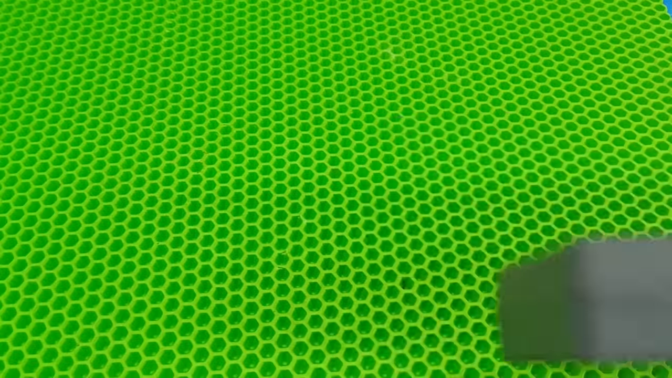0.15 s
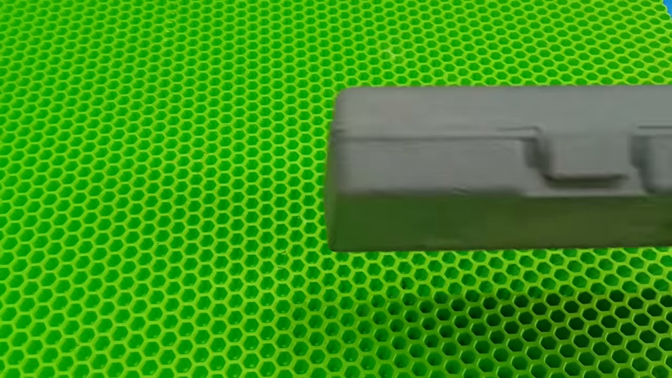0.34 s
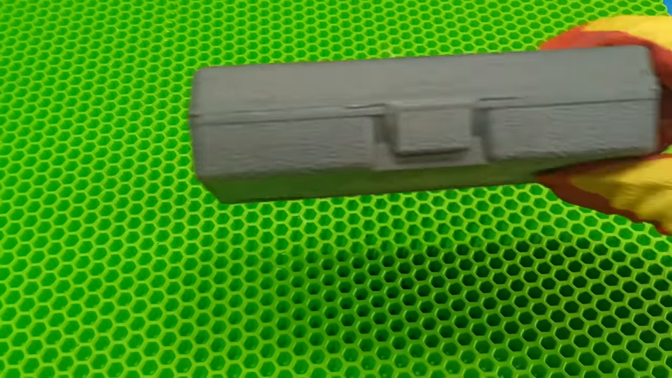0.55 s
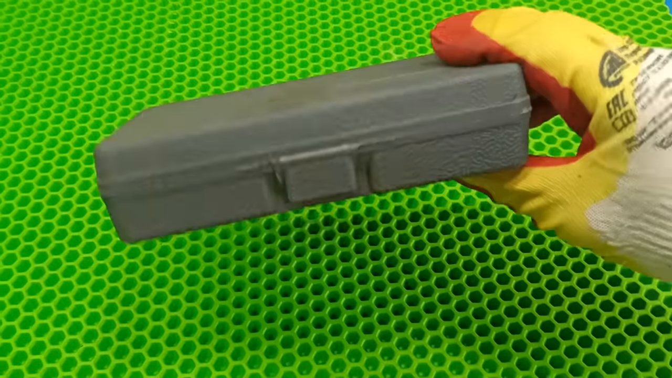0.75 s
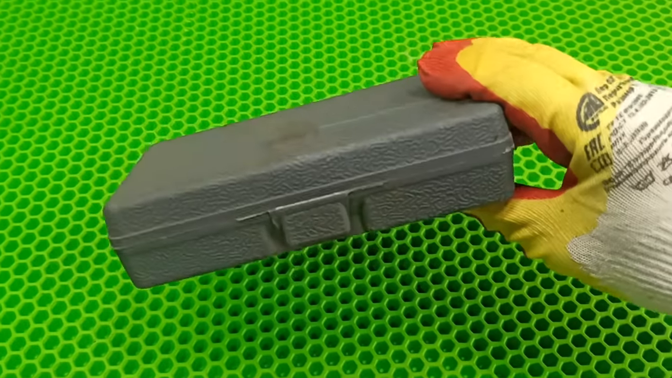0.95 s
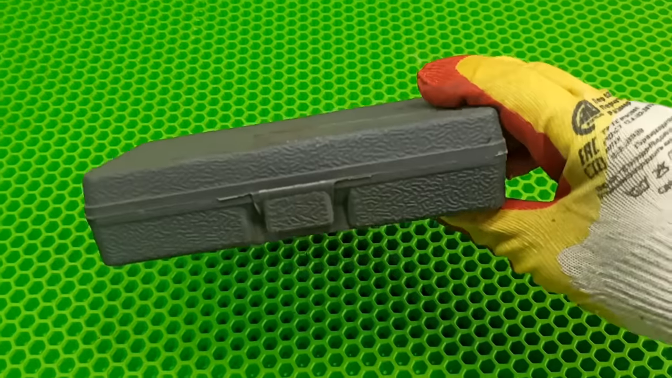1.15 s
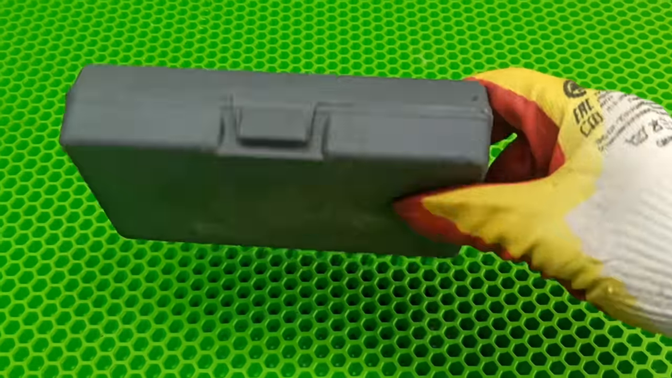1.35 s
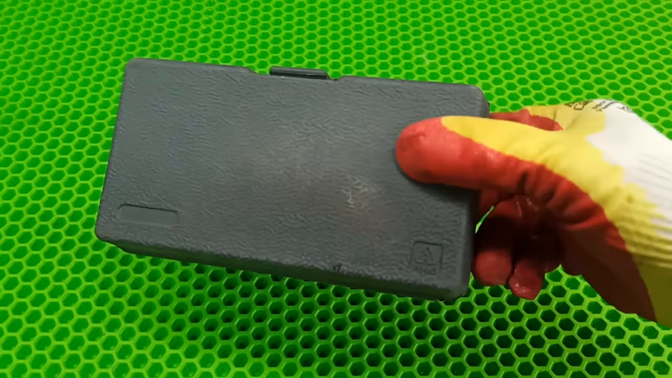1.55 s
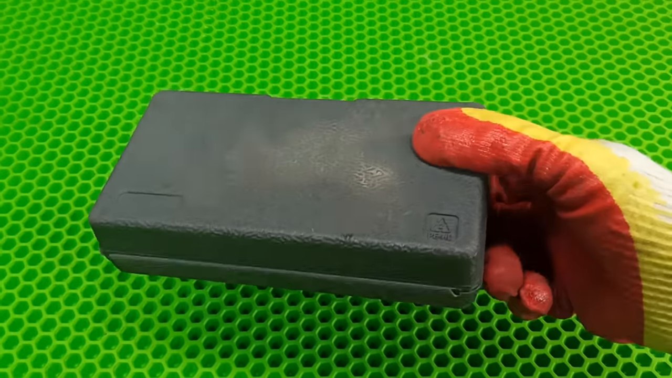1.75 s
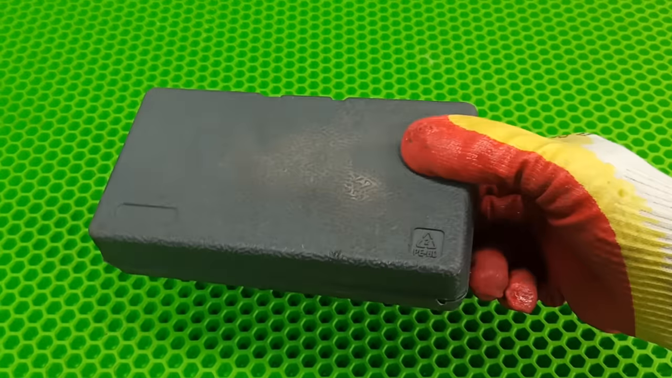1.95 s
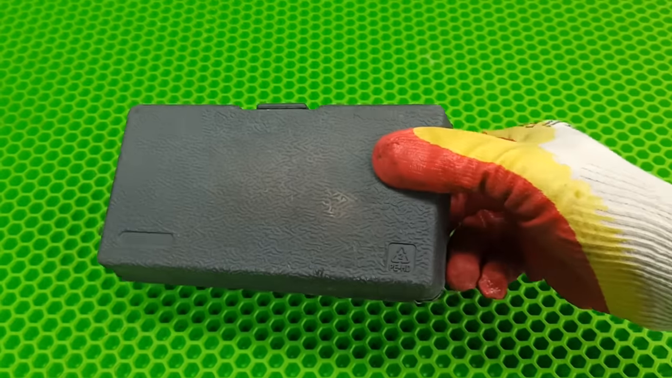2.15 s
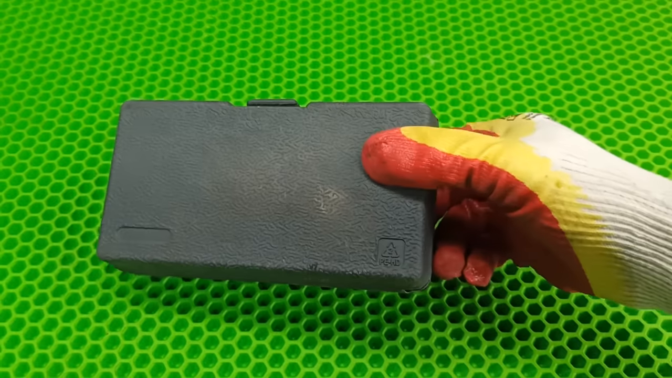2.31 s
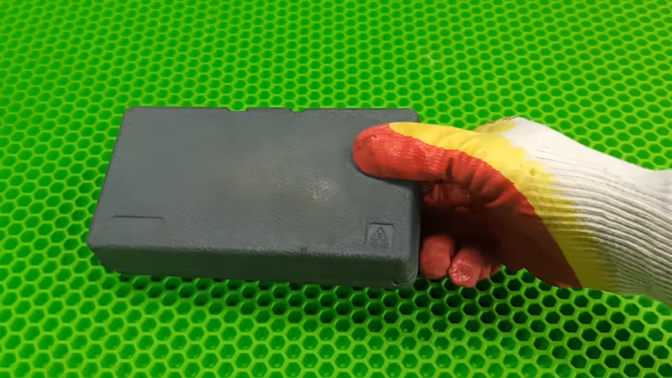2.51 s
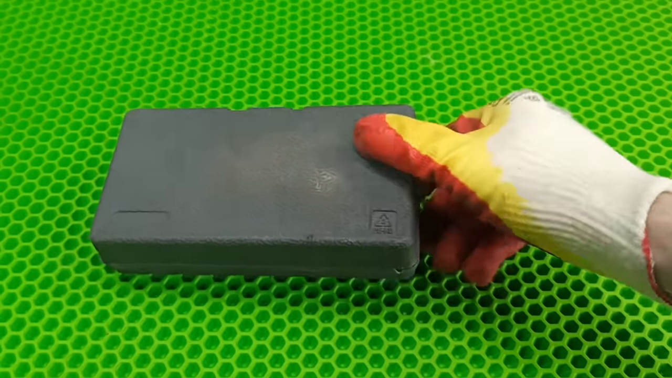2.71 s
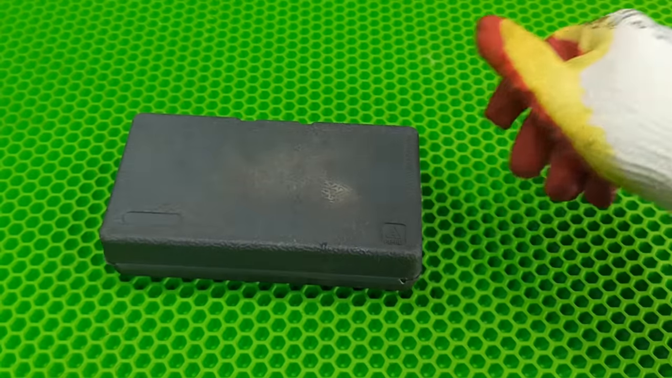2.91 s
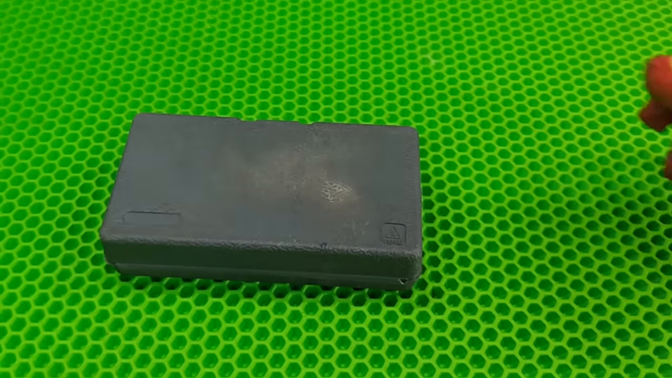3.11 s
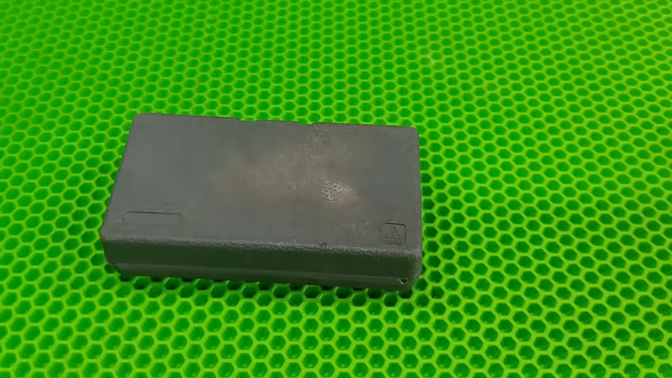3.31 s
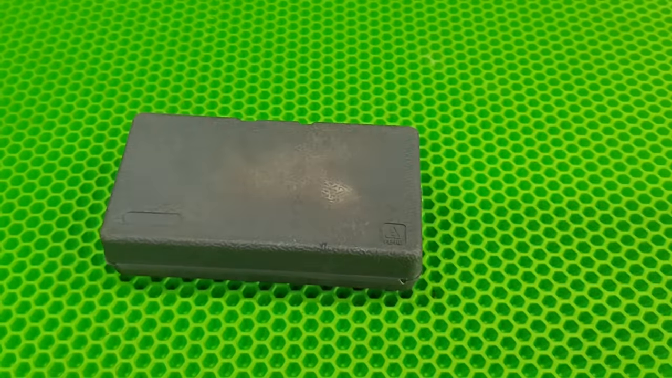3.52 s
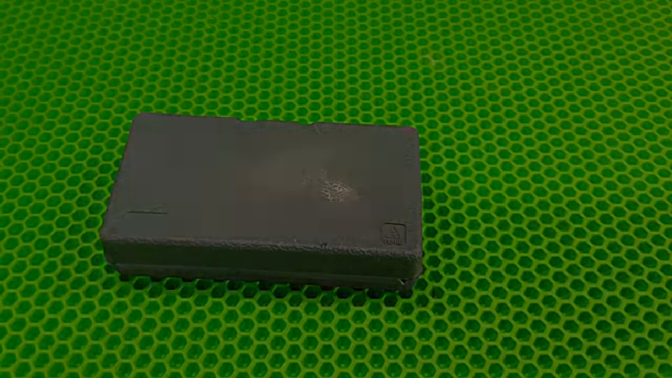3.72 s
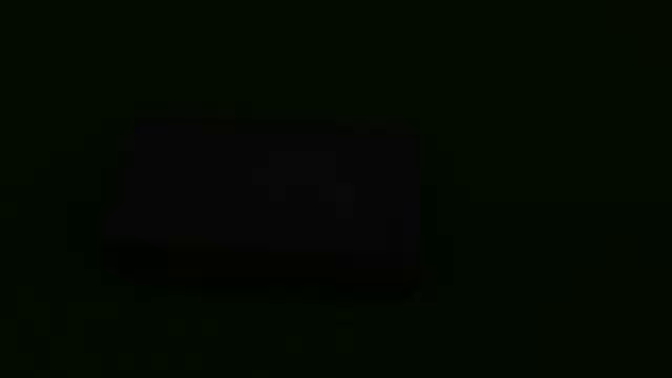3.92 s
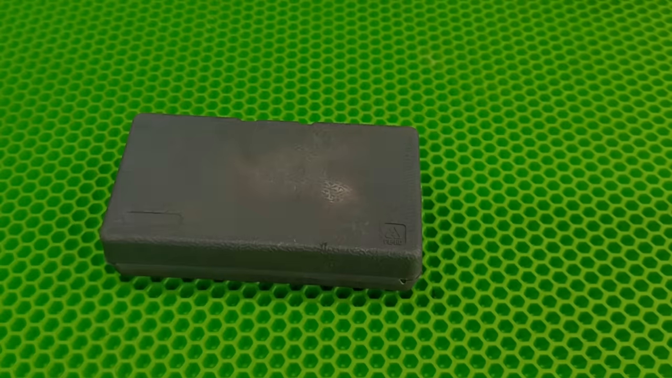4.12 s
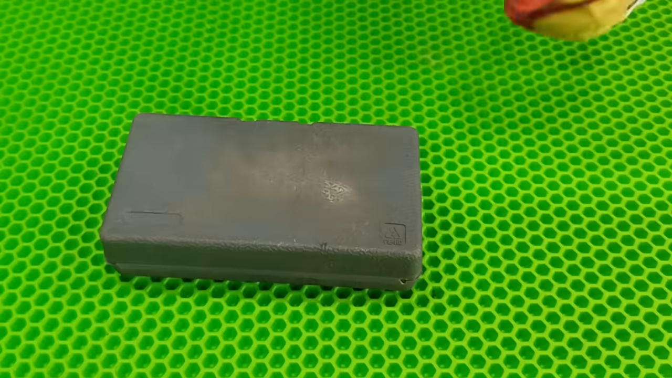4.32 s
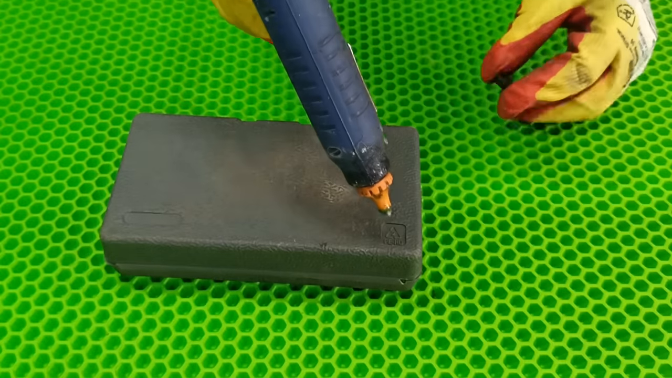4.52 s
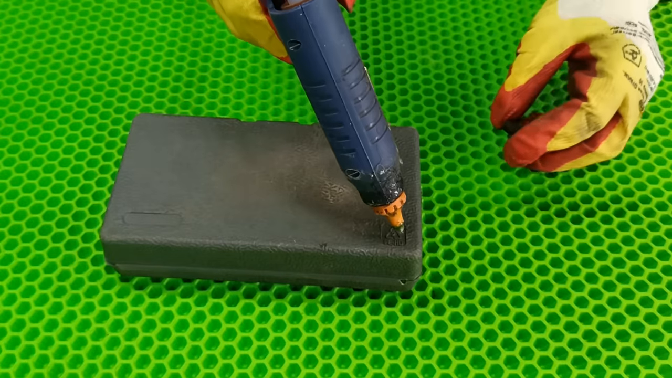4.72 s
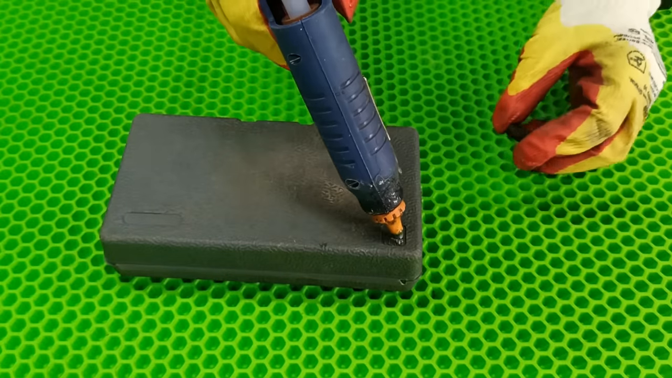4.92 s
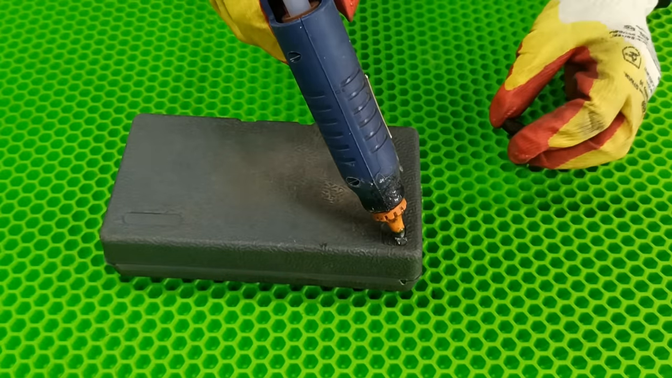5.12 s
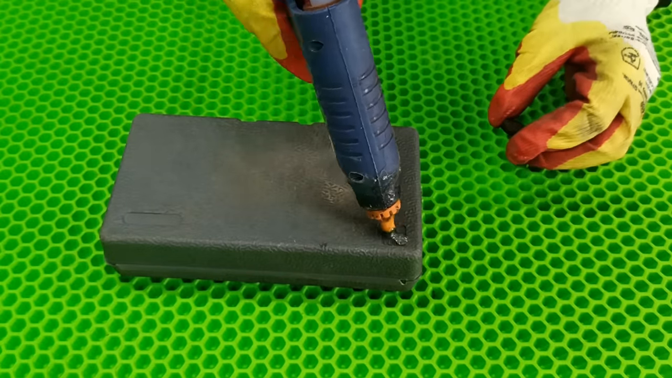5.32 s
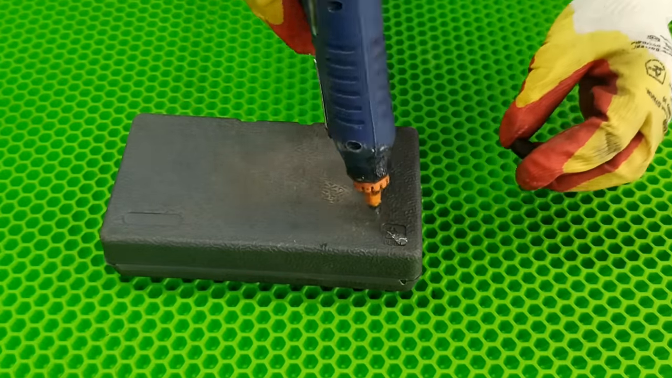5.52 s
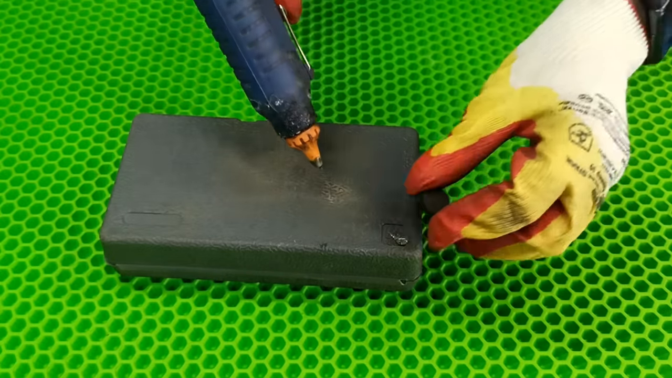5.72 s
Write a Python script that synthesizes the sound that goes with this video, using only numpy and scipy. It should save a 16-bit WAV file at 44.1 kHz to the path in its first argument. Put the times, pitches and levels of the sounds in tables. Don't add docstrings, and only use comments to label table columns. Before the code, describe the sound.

Close indoor workshop sounds: soft glove rubs, hollow knocks and loose tools shifting inside a plastic case, a sharp double knock, then a heavy flat drop rocking to rest. The background air changes smoothly; a bright sliding hiss grows, a hard plastic clunk bounces several times, and small dry taps finish over faint room noise.

```python
import sys
import numpy as np
from scipy import signal
from scipy.fft import rfft, irfft, next_fast_len
from scipy.io import wavfile
from scipy.ndimage import uniform_filter1d, map_coordinates

SR = 44100
rng = np.random.default_rng(int(sys.argv[2]) if len(sys.argv) > 2 else 0)


def linear_from_db(decibels):
    return 10 ** (np.asarray(decibels, float) / 20)


def bounce(signal):
    frames = np.transpose(np.atleast_2d(signal))
    limited = np.clip(frames, -1, 1)
    pcm = np.round(limited * 32767).astype(np.int16)
    wavfile.write(sys.argv[1], SR, pcm)


N = 253575
TIME = np.arange(N) / SR
EVENT_TIME = np.arange(SR // 4) / SR

# (frequency [Hz], width [Hz], level [dB])
TOOL_MODES = [(482, 60, 2), (684, 80, 3.5), (843, 113, 2.5), (973, 110, 3.5), (1210, 310, -2.5),
              (1630, 370, -6.5), (2034, 200, -12), (2360, 130, -13), (3380, 2200, -19.5)]
# (frequency [Hz], width [Hz], level [dB])
BARREL_MODES = [(237, 39, -14.5), (490, 90, -14), (658, 97, -5), (777, 120, -7.5), (1145, 97, 0),
                (1380, 226, -7.5), (1700, 290, -7), (2346, 137, -4), (2800, 540, -12), (3650, 670, -13.5),
                (4220, 1530, -21.5)]
# (frequency [Hz], level [dB per Hz])
CRACK_SPECTRUM = [(900, -40), (1800, 4.5), (3200, -18.5), (4400, -3), (6800, -1.5), (8500, -12),
                  (12000, -37.5), (16000, -38.5)]
# (frequency [Hz], level [dB per Hz])
SLIDE_SPECTRUM = [(1200, -19), (2000, -9), (3400, -10), (5500, -8), (7500, -4), (9400, -4), (12000, -12),
                  (13000, -42)]
# (frequency [Hz], level [dB per Hz])
SHEEN_SPECTRUM = [(10500, -59), (12300, 2.5), (13500, -7), (15000, -6), (16000, -0.5)]
# (time [s], peak [dB], snap [dB], t60 [s])
GUN_LANDING = [
    (4.634, -20.5, -27, 0.023),
    (4.6367, -21, -14, 0.041),
    (4.644, -28.5, -8, 0.057),
    (4.657, -28.5, -13, 0.072),
    (4.684, -28, -22, 0.033),
    (4.692, -30.5, -20, 0.05),
    (4.71, -32.5, -32, 0.047),
    (4.728, -41, -22, 0.057),
]
LANDED_S = GUN_LANDING[0][0]


def unit(x):
    return x / np.sqrt(np.mean(x ** 2) + 1e-20)


def peak(x):
    return x / np.abs(x).max()


def add(track, s, sound):
    part = track[round(s * SR):][:len(sound)]
    part += sound[:len(part)]


def along(points, hz):
    f, db = np.transpose(points)
    return linear_from_db(np.interp(np.log(hz + 1), np.log(f + 1), db))


def filtered(x, response):
    m = next_fast_len(len(x) + SR // 16)
    return irfft(rfft(x, m) * response(np.fft.rfftfreq(m, 1 / SR)), m)[:len(x)]


def coloured(x, points):
    return filtered(x, lambda f: along(points, f))


def ringing(modes):
    top_hz = 1.35 * max(hz for hz, _, _ in modes)

    def response(f):
        total = 0
        for k, (hz, width, db) in enumerate(modes):
            damping = 1j * f * width
            total = total + (-1) ** k * linear_from_db(db) * damping / (hz * hz - f * f + damping)
        return total / (1 + 1j * f / top_hz)
    return response


def grit(rate, spread_db):
    knots = rng.standard_normal(N // 20 + 4)
    level = map_coordinates(knots, [np.arange(N) * min(rate, 2000) / SR], order=1)
    return linear_from_db(spread_db * level) * rng.standard_normal(N)


def puff(t, t60):
    return linear_from_db(-60 * t / t60) * rng.standard_normal(len(t))


def strike(t, t60, edge):
    return puff(t, t60) + edge * (t == t[t > 0][0])


def swells(rows):
    power = 0
    for s, db, rise, fall in rows:
        away = np.maximum((s - TIME) / abs(rise), (TIME - s) / abs(fall))
        power = power + linear_from_db(db - 20 * away) ** 2
    return np.sqrt(power)


def raised(rows):
    return [(s, db + over_db, rise, fall) for s, db, rise, fall, over_db in rows]


def shop(x, wet_db, reach=1):
    # (frequency [Hz], t60 [s])
    room_decay = [(80, 0.083), (250, 0.43), (1000, 0.47), (4000, 0.33), (12000, 0.17)]
    hz, t, z = signal.stft(rng.standard_normal(SR // 4), SR, nperseg=256)
    room_hz, room_s = np.transpose(room_decay)
    t60 = reach * np.interp(np.log(hz + 1), np.log(room_hz), room_s)
    tail = signal.istft(z * linear_from_db(-60 * t / t60[:, None]), SR, nperseg=256)[1]
    tail *= 1 - np.exp(-np.arange(len(tail)) / SR / 0.001)
    return x + linear_from_db(wet_db) * signal.fftconvolve(x, tail / np.linalg.norm(tail))[:len(x)]


def fade():
    # (start [s], end [s])
    change = (3.7, 4.2)
    return np.pi / 2 * np.clip((TIME - change[0]) / (change[1] - change[0]), 0, 1)


def air(spectrum, db):
    return linear_from_db(db) * unit(coloured(grit(8, spread_db=1), spectrum))


def handling():
    # (time [s], hiss [dB], rise [s], fall [s], stirred load over hiss [dB])
    rubs = [(.002, -60.5, .05, 0.2, 1), (.29, -57, 0.13, 0.18, -9), (0.568, -52.5, 0.076, 0.14, -7),
            (.76, -68, 0.036, 0.23, 4.5), (1.05, -71.5, 0.45, 0.32, -7), (1.52, -65, 0.31, 0.52, 0.5),
            (2.55, -75, 0.85, 0.18, 5.5), (2.698, -56.5, 0.18, 0.066, 0), (2.803, -56, 0.071, 0.3, 0.5),
            (3.02, -52, 0.16, 0.257, 1.5), (3.348, -68, 0.54, 0.47, -9.5), (3.594, -64.5, 0.078, 0.21, 2.5),
            (3.71, -73.5, 0.12, 0.12, 8.5)]
    # (time [s], boom [dB], rattle over boom [dB], fall by 20 dB [s])
    jolts = [(.35, -40, -3, 0.11), (.415, -44, -10, 0.17), (0.465, -52.5, -7.5, 0.02),
             (0.779, -49.5, -12, 0.09), (0.94, -62.5, -5.5, -0.65), (1.349, -59, -20, -0.4),
             (1.55, -45.5, -15, 0.25), (2.011, -54, 2, -0.12), (2.915, -29, -1, 0.1942),
             (3.0, -34.5, 4, 0.16), (3.12, -44, -17, 0.05)]
    # (frequency [Hz], width [Hz], level [dB])
    shell_modes = [(174.2, 90, -3), (254, 20, 0), (345, 24, -1), (415.4, 136, -3.5)]
    # (frequency [Hz], level [dB per Hz])
    glove_spectrum = [(900, -24), (1500, 1.5), (3300, -1), (4500, -0.5), (7400, 0), (12000, -18),
                      (16000, -20.5)]
    # (frequency [Hz], level [dB per Hz])
    bench_spectrum = [(30, -18), (60, -14.5), (75, -3.5), (100, -4.5), (130, -24.5), (200, -60.5)]
    jolt_rise_s, rattle_falls = 0.02, 0.6
    boom_jolts = [(s, db, jolt_rise_s, fall) for s, db, _, fall in jolts]
    rattle_jolts = [(s, db + over_db, jolt_rise_s, rattle_falls * fall) for s, db, over_db, fall in jolts]
    boom = unit(filtered(grit(70, spread_db=2.5), ringing(shell_modes)))
    rattle = unit(filtered(grit(150, spread_db=4), ringing(TOOL_MODES)))
    hiss = unit(coloured(grit(120, spread_db=1.0), glove_spectrum))
    bench = unit(coloured(grit(3.3, spread_db=-2.0), bench_spectrum))
    rumble_gain = linear_from_db(-66.5) * np.cos(fade()) + swells([(3.15, -53, .35, .5)])
    out = swells(raised(rubs) + boom_jolts) * boom
    out += swells(raised(rubs) + rattle_jolts) * rattle
    out += swells([row[:4] for row in rubs]) * hiss
    return out + rumble_gain * bench


def case_knocks():
    # (time [s],
    # peak [dB], wall pitch [Hz], t60 [s], hardness [dB])
    wall_knocks = [(0.009, -45, 310, 0.031, -37), (0.04, -57, 433, 0.036, -35), (0.064, -54, 322, 0.04, -34),
                   (0.084, -49, 400, 0.035, -30), (0.094, -45, 356, 0.046, -37),
                   (0.104, -44.5, 391, 0.055, -28), (0.157, -50.5, 326, 0.074, -8.5),
                   (0.318, -32, 214, 0.075, -44), (0.325, -31.5, 291, 0.052, -33),
                   (0.331, -26, 330, 0.016, -21), (0.34, -27, 240, 0.032, -17.5), (0.357, -32, 262, 0.015, -24),
                   (0.391, -28.5, 295, 0.015, -25), (0.4, -29.5, 280, 0.014, -27),
                   (0.409, -34, 333, 0.081, -36), (0.451, -31, 308, 0.041, -24), (0.474, -45, 250, 0.035, -24),
                   (0.584, -55, 480, 0.083, -18), (0.644, -52.5, 327, 0.15, -1),
                   (0.74, -50.5, 352, 0.086, -8.5), (0.76, -49, 363, 0.065, -26), (0.773, -44, 340, 0.035, -24),
                   (0.7792, -38, 344.6, 0.15, -26), (0.82, -35.5, 345, 0.052, -36), (0.935, -45, 254, 0.1, -20),
                   (1.345, -43, 349, 0.086, -42), (1.452, -34.5, 269, 0.057, -21.5),
                   (1.523, -41, 268, 0.057, -11), (1.538, -18.5, 341, 0.031, -22), (1.548, -20, 285, 0.04, -31),
                   (2.0, -29, 408, 0.024, -37), (2.014, -39.5, 420, 0.049, -40), (2.028, -39, 398, 0.04, -45),
                   (2.05, -47, 413.5, 0.2, -46.5), (2.06, -46, 397, 0.08, -45),
                   (2.344, -48.5, 225, 0.049, -25), (2.439, -51.5, 357.6, 0.13, -19),
                (2.489, -54, 273, 0.11, 6.5), (2.616, -46.5, 364, 0.054, -11), (2.691, -47, 345, 0.065, -9),
                (2.806, -45.5, 345, 0.08, -4), (2.839, -40.5, 160, 0.018, -11.5),
                (2.879, -23.5, 357, 0.071, -25.5), (2.894, -22.5, 300, 0.016, -17.5),
                (2.8993, -5.5, 249.2, 0.032, -17.5), (2.914, -13, 327, 0.06, -13),
                (2.92, -23.5, 388, 0.059, -8.5), (2.928, -20.5, 213, 0.052, -32),
                (2.945, -27, 249.7, 0.05, -11.5), (2.961, -21.5, 331, 0.08, -13.5),
                (2.977, -14.5, 209, 0.047, -11.5), (2.989, -19.5, 283, 0.045, -16),
                (3.007, -18.5, 275, 0.058, -25), (3.02, -15.5, 281, 0.02, -23),
                (3.034, -22, 267, 0.03, -13), (3.052, -21.5, 342, 0.04, -13.5),
                (3.088, -32, 330, 0.084, -35.5), (3.118, -37, 357, 0.035, -2),
                (3.597, -51.5, 497, 0.069, -28.5),
                   (3.61, -50.5, 689, 0.093, -16),
        (3.698, -57, 615, 0.32, -16),
    ]
    padded_hz = 6500
    out, t = np.zeros(N), EVENT_TIME
    late = np.maximum(t - .002, 0)

    def muffled_tools(f):
        return ringing(TOOL_MODES)(f) / (1 + 1j * f / padded_hz)

    for s, db, hz, t60, crack_db in wall_knocks:
        soft_start = 1 - np.exp(-t / 0.0014)
        wall = peak(np.sin(2 * np.pi * hz * t) * linear_from_db(-60 * t / t60) * soft_start)
        rattle = peak(filtered((late > 0) * strike(late, 0.014, edge=5.9), muffled_tools))
        crack = peak(coloured((late > 0) * strike(late, 0.037, edge=0.63), CRACK_SPECTRUM))
        rattle_db = 3.5 + .4 * crack_db
        knock = wall + linear_from_db(rattle_db) * rattle + linear_from_db(crack_db + 5.0) * crack
        add(out, s, shop(linear_from_db(db - 3.0) * knock, wet_db=-9.0))
    return out


def latch_ticks():
    # (time [s], peak [dB], pitch [Hz])
    small_ticks = [(0.339, -26.5, 1250), (0.339, -34, 3300), (0.329, -30, 1050), (0.359, -32, 1100),
                   (0.391, -37.5, 1290), (0.401, -51, 2200), (0.396, -33, 970), (0.451, -40.5, 1500),
                   (0.537, -49, 800), (0.645, -46, 1450), (0.758, -49, 970), (0.801, -44, 1690),
                   (0.8198, -43, 1100), (0.885, -63, 1500), (0.944, -57, 900), (2.002, -34.5, 920),
                   (2.001, -36.5, 1900), (2.002, -48.5, 3300), (2.0033, -48, 2460), (2.039, -55, 1900),
                   (0.476, -40, 1000), (0.519, -47, 1960), (0.7735, -43, 1400), (0.7965, -40.5, 1750),
                   (0.904, -47, 1720), (0.9337, -44.5, 1720), (1.6422, -48, 1630), (1.7771, -33, 3620),
                   (1.778, -41.5, 1400), (2.3898, -52.5, 1630), (2.462, -46, 3450), (2.491, -52, 1350),
                   (2.709, -50, 1394), (2.792, -57, 1560), (2.808, -41.5, 1190), (3.701, -46, 1960)]
    out, brief = np.zeros(N), EVENT_TIME[:SR // 40]
    for s, db, hz in small_ticks:
        part = ringing([(hz, 400, 0), (1.88 * hz, 1800, -9)])
        add(out, s, linear_from_db(db - 3.0) * peak(filtered(strike(brief, 0.0042, edge=3.4), part)))
    return shop(out, wet_db=-12.0)


def steel_clinks():
    # (frequency [Hz], level [dB])
    steel_partials = [(6470, -0.5), (6860, -3.5), (7490, -11.5), (8200, 0), (11800, -19.5), (12900, -20.5),
                      (13630, -19), (14900, -20)]
    # (time [s], level [dB], t60 [s])
    meetings = [
        (2.899, -51.5, .04),
        (2.917, -51, 0.045),
        (2.983, -48, .12),
        (2.994, -52.5, 0.064),
        (3.045, -67, 0.11),
        (3.078, -66.5, 0.14),
        (3.12, -53, 0.1),
        (3.153, -75, 0.15),
    ]
    out, t = np.zeros(N), EVENT_TIME
    for s, db, t60 in meetings:
        ring = np.zeros(len(t))
        for hz, level in steel_partials:
            gain = linear_from_db(level + rng.normal(0, 2.2))
            ring += gain * np.sin(2 * np.pi * hz * (1 + .006 * rng.normal()) * t)
        rough = 1 + .3 * rng.standard_normal(len(t))
        add(out, s, linear_from_db(db - 60 * t / t60) * ring * rough)
    return shop(out, wet_db=-12.0)


def gun_slips():
    # (time [s], peak [dB], top hiss [dB], t60 [s], nozzle ring [dB])
    sudden_slips = [
        (3.81, -54.5, -12, 0.17, -11),
        (3.972, -58.5, -11, 0.76, -11),
        (4.0972, -44.5, -4, 0.28, -16),
        (4.1611, -45, 0.5, 0.26, -14),
        (4.2547, -51, -17, 0.28, -12),
        (4.4143, -34.5, -5, 0.13, -0.5),
    ]
    # (frequency [Hz], width [Hz], level [dB])
    nozzle_modes = [(12430, 35, 0), (12680, 30, -6), (13300, 60, -6), (8870, 60, -9)]
    out, t = np.zeros(N), EVENT_TIME
    for s, db, top_db, t60, ring_db in sudden_slips:
        hiss = peak(coloured(puff(t, t60), SLIDE_SPECTRUM))
        top = peak(coloured(puff(t, t60), SHEEN_SPECTRUM))
        ring = peak(filtered(puff(t, .2), ringing(nozzle_modes)))
        ring_gain = linear_from_db(ring_db + 0.68 * (db + 29.5))
        add(out, s, linear_from_db(db) * (hiss + linear_from_db(top_db) * top + ring_gain * ring))
    return out


def effort():
    # (time [s], level [dB])
    stroke = [
        (3.9, -101),
        (4.028, -60.5),
        (4.052, -77.5),
        (4.166, -50),
        (4.205, -62),
        (4.235, -49.5),
        (4.4, -44.5),
        (4.52, -47.5),
        (4.625, -78),
    ]
    # (time [s], hiss [dB], time to lose 20 dB [s], top hiss over hiss [dB])
    sweep = (4.4, -44, .19, -6)
    # (time [s], hiss [dB], rise [s], fall [s], top hiss over hiss [dB])
    scuff = (4.418, -44, .008, .08, 3)
    # (time [s], body [dB], rise [s], fall [s], hiss over body [dB])
    chatter = (4.5, -43, 10, 0.15, -22)
    # (time [s], hiss [dB], rise [s], fall [s], body over hiss [dB])
    grip_shifts = [
        (4.95, -83.5, 0.44, 0.44, 9.5),
        (5.141, -83.5, 0.15, 0.25, 12),
        (5.308, -69, 0.054, 0.1, -6),
        (5.406, -86.5, 0.22, 0.18, 14.5),
        (5.48, -70, 0.12, 0.13, -10),
        (5.69, -71, 0.17, 0.28, 1),
    ]
    stroke_s, stroke_db = np.transpose(stroke)
    pressure = linear_from_db(np.interp(TIME, stroke_s, stroke_db, -120, -120))
    fastest_s, speed_db, width_s, sheen_db = sweep
    speed = linear_from_db(speed_db - 20 * ((TIME - fastest_s) / width_s) ** 2)
    landed = TIME > LANDED_S
    grips = swells([row[:4] for row in grip_shifts])
    body = pressure + landed * swells([chatter[:4]]) + swells(raised(grip_shifts))
    hiss = speed + swells([scuff[:4]]) + landed * swells(raised([chatter])) + grips
    top = linear_from_db(sheen_db) * speed + swells(raised([scuff])) + linear_from_db(1.5) * grips
    return body, hiss, top


def gun_drag():
    # (frequency [Hz], width [Hz], level [dB])
    gun_modes = [(531.5, 63, -1), (681, 46, 3.5), (787, 40, 2.5), (1019, 51, 3.5), (1190, 58, 2.5),
                 (1400, 140, -3), (1650, 270, -4), (2200, 600, -10), (3510, 860, -12), (3970, 1200, -18.5)]
    body_gain, hiss_gain, top_gain = effort()
    sliding = abs(TIME - LANDED_S - .09) > .09
    body = unit(filtered(grit(110, spread_db=2.0), ringing(gun_modes)))
    barrel = unit(filtered(grit(110, spread_db=2.0), ringing(BARREL_MODES)))
    out = body_gain * np.where(sliding, body, barrel)
    out += hiss_gain * unit(coloured(grit(300, spread_db=1), SLIDE_SPECTRUM))
    return out + top_gain * unit(coloured(grit(300, spread_db=1), SHEEN_SPECTRUM))


def nozzle_taps():
    # (time [s], peak [dB], snap [dB], t60 [s], thud [dB])
    lid_contacts = [(3.999, -54.5, -17, 0.012, -27), (4.021, -59, 7, 0.011, -19),
                    (4.155, -41, -17, 0.039, -17.5), (4.479, -36, -17, 0.07, -19),
                    (5.053, -64, 5, 0.0126, -2), (5.12, -68.5, 9.5, 0.012, -18),
                    (5.143, -63, -19.5, 0.012, -10), (5.302, -57, 8, 0.012, -18),
                    (5.314, -50, -5.5, 0.012, -5), (5.324, -56, 5, 0.011, 1), (5.394, -48.5, -25, 0.04, -3),
                    (5.481, -32, 1.5, 0.009, -33.5), (5.486, -47.5, -21, 0.013, 6),
                    (5.529, -47.5, -9, 0.027, -10.5), (5.539, -43, -8, 0.018, -18),
                    (5.614, -38.5, -34, 0.0095, -22)]
    # (frequency [Hz], width [Hz], level [dB])
    lid_modes = [(800, 830, -4), (1626, 270, 0), (2610, 530, -11)]
    # (frequency [Hz], level [dB per Hz])
    snap_spectrum = [(1500, -31), (2500, -2.5), (4600, -8.5), (7700, -1.5), (11000, -37), (15000, -10)]
    thud_modes = [(275, 93, -7.5), (450, 190, -5.5)]
    out, t = np.zeros(N), EVENT_TIME
    for s, db, snap_db, t60, thud_db in lid_contacts:
        lid = peak(filtered(strike(t, t60, edge=4.1), ringing(lid_modes)))
        snap = peak(coloured(strike(t, 0.00264, edge=8.2), snap_spectrum))
        thud = peak(filtered(strike(t, 0.0024, edge=11.0), ringing(thud_modes)))
        tap = lid + linear_from_db(snap_db + 9.5) * snap + linear_from_db(thud_db - 1.5) * thud
        add(out, s, shop(linear_from_db(db + 1.0) * tap, wet_db=-9.5, reach=0.47))
    return out


def gun_clunks():
    out, t = np.zeros(N), EVENT_TIME
    for s, db, snap_db, t60 in GUN_LANDING:
        barrel = peak(filtered(strike(t, t60, edge=8.3), ringing(BARREL_MODES)))
        snap = peak(coloured(puff(t, t60), CRACK_SPECTRUM))
        clunk = barrel + linear_from_db(snap_db + 1) * snap
        add(out, s, shop(linear_from_db(db - 1.5) * clunk, wet_db=-5.0, reach=0.57))
    return out


def scene():
    # (frequency [Hz], level [dB per Hz])
    first_air = [(60, -21.5), (130, -0.5), (250, -0.5), (400, -6.5), (800, -12.5), (1500, -17.5),
                 (2600, -21.5), (4200, -18.5), (7400, -23), (12000, -31), (16000, -23.5)]
    second_air = [(60, -26), (110, -0.5), (180, 3), (300, 0), (500, -4), (1160, -13.5), (3000, -16),
                  (8900, -21.5), (13000, -23.5), (16000, -28.5)]
    # (frequency [Hz], level [dB])
    first_mic = [(30, -18.5), (80, -11), (140, 0.5), (4750, -1.5), (4950, -10), (5900, -8), (6200, -1),
                 (8500, -1.5), (8800, -12.5), (11400, -12), (11700, 6), (15700, 1.5), (15950, -42.5)]
    second_mic = [(30, -9), (125, -9.5), (175, 0), (9400, -1.5), (9700, -10), (12000, -7), (12300, 1.5),
                  (15700, 3), (15950, -42)]
    turn = fade()
    first = np.cos(turn) * air(first_air, db=-68.0) + handling()
    first += case_knocks() + latch_ticks() + steel_clinks()
    second = np.sin(turn) * air(second_air, db=-67.0)
    second += gun_slips() + gun_drag() + nozzle_taps() + gun_clunks()
    return (coloured(first, first_mic) + coloured(second, second_mic))[None]


def top_cut(x):
    return signal.sosfilt(signal.butter(12, 16430, fs=SR, output="sos"), x)


def record(dry):
    # (time [s], loss [dB])
    treble_gaps = [(.12, -9), (.575, -6), (1.14, -9), (1.21, -9), (1.42, -11), (1.885, -12), (2.23, -9),
                   (2.305, -9), (2.755, -6), (3.255, -9), (3.58, -9), (4.885, -8), (5.205, -10)]
    # (start [s], end [s], low edge [Hz], high edge [Hz])
    lost_band = (2.93, 3.16, 10300, 11350)
    gap_s = .022
    loss_db = sum(db * (abs(TIME - s) < gap_s / 2) for s, db in treble_gaps)
    treble = filtered(dry[0], lambda f: 1 / (1 + (1500 / (f + 1)) ** 4))
    kept = dry + (linear_from_db(uniform_filter1d(loss_db, size=60)) - 1) * treble
    start, end, low_hz, high_hz = lost_band
    band = filtered(dry[0], lambda f: (f > low_hz) & (f < high_hz))
    lost = uniform_filter1d(1. * ((TIME > start) & (TIME < end)), size=400)
    return top_cut(kept - lost * band)


dry = scene()
out = record(dry)
bounce(out)
```